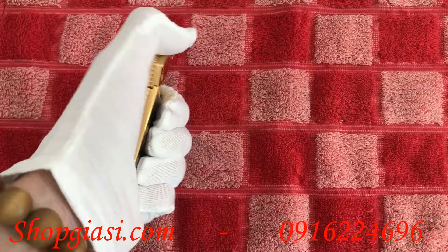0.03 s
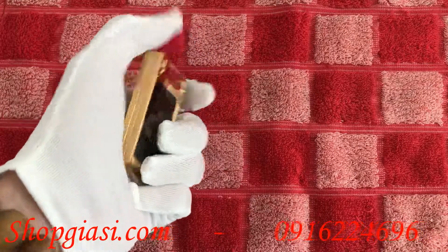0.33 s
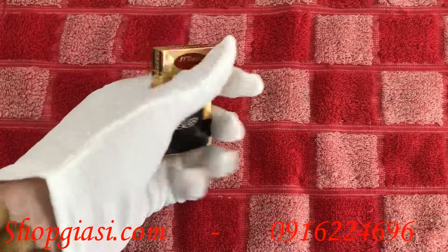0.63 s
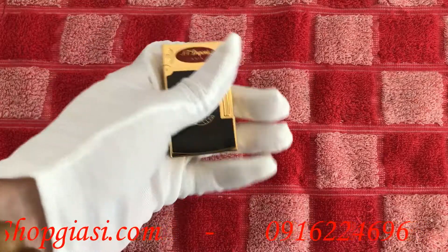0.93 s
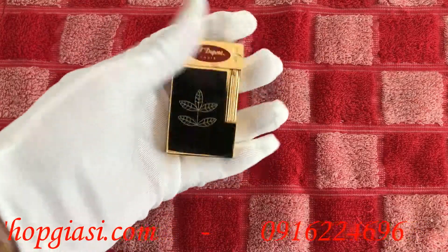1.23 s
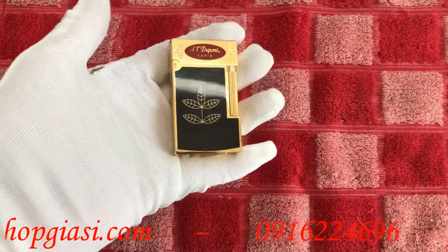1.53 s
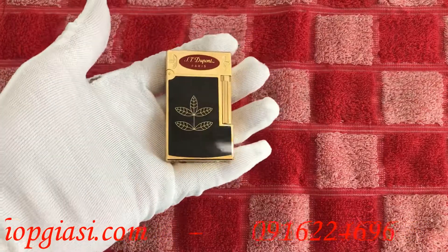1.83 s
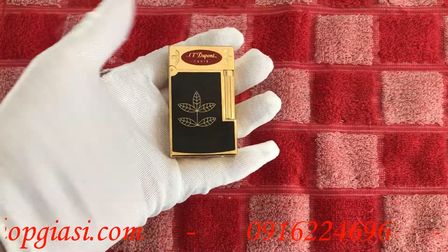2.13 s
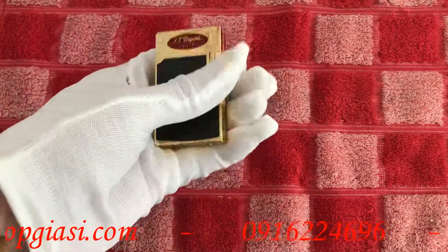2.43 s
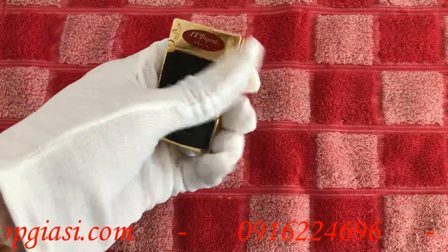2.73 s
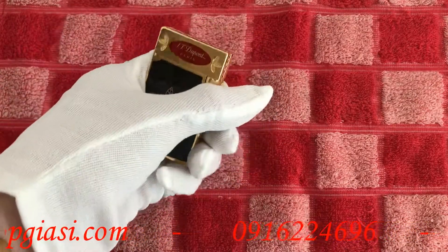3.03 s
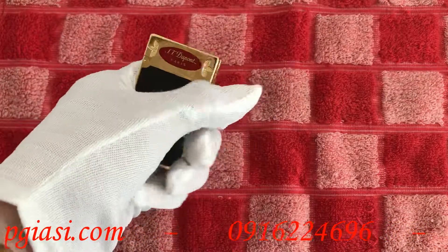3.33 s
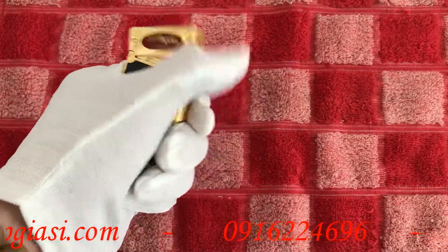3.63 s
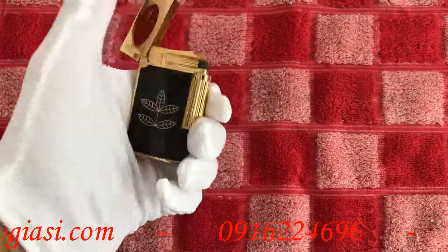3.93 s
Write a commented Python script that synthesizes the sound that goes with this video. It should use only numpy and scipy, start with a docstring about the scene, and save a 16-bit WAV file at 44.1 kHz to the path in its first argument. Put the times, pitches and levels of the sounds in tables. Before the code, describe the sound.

Close up in a small room, a metal lighter clicks sharply shut and, after a pause with soft glove rustles, springs open with a clear ringing ping. Faint motorbike engines and traffic hum outside throughout.

```python
"""A metal lighter is snapped shut, turned in a gloved hand and flicked open again, close by.
Each impact excites the modes of lid and case: shut, they give a short bright clink; open, the free lid
rings like a small bell. Friction of glove and hinge adds soft noise, and a small room reverberates.
Outside, in faint traffic rumble, one motorbike idles and another pulls away, each sounding the
harmonics of its firing rate."""
import sys
import numpy as np
from scipy import signal
from scipy.fft import rfft, irfft
from scipy.io import wavfile

SR = 44100
rng = np.random.default_rng(int(sys.argv[2]) if len(sys.argv) > 2 else 0)


def dump(signal):
    """Clip the signal to [-1, 1] and save it as 16-bit WAV at the path in sys.argv[1]."""
    limited = np.clip(np.atleast_2d(signal).T, -1, 1)
    pcm = np.round(limited * 32767).astype(np.int16)
    wavfile.write(sys.argv[1], SR, pcm)


N = 176400
T = np.arange(N) / SR
FREQS = np.fft.rfftfreq(N, 1 / SR)


def undb(db):
    """Amplitude ratio of a level in decibels."""
    return 10 ** (np.asarray(db) / 20)


def unit(x):
    """Normalisation to rms 1."""
    return x / np.sqrt(np.mean(x ** 2))


def curve(rows, column=1):
    """Linear interpolation of one column over time."""
    rows = np.array(rows)
    return np.interp(T, rows[:, 0], rows[:, column])


def filtered_noise(gain):
    """Spectral shaping of white noise, rms 1."""
    return unit(irfft(rfft(rng.standard_normal(N)) * gain, N))


def noise(spectrum):
    """Coloured noise, falling 12 dB per octave below the first point of its spectrum."""
    hz, db = np.array(spectrum).T
    low_cut = np.minimum(FREQS / hz[0], 1) ** 2
    return filtered_noise(undb(np.interp(np.log(FREQS + 1), np.log(hz), db)) * low_cut)


def band(hz, half_width_hz):
    """Noise through a single resonance."""
    return filtered_noise(1 / (1 + ((FREQS - hz) / half_width_hz) ** 2))


def drift(cutoff_hz):
    """Slow random modulation: low-passed noise."""
    return filtered_noise(np.exp(-(FREQS / cutoff_hz) ** 2))


def fade(start, t60):
    """Exponential decay, 60 dB in t60 seconds."""
    return (T >= start) * np.exp(-np.log(1000) * np.clip((T - start) / t60, 0, 10))


def swell(centre, half_width):
    """Gaussian envelope, 1/e at one half-width from its centre."""
    return np.exp(-np.minimum(((T - centre) / half_width) ** 2, 10 ** 2))


def ring(start, hz, db, t60, attack_s=0.00038):
    """Free vibration of a struck mode: a damped sinusoid."""
    age = np.maximum(T - start, 0)
    return undb(db) * fade(start, t60) * (1 - np.exp(-age / attack_s)) * np.sin(2 * np.pi * hz * age)


def traffic():
    """Amplitude-modulated noise: rumble and tyre wash ebb while narrow bands of hiss swell and fade."""
    # spectra (frequency [Hz], relative density [dB])
    rumble_spectrum = [(20, -35), (35, -24.5), (50, -10.5), (66, -7), (81, 2), (96, -7.5), (116, 2.5),
                       (135, -6.5), (160, -21), (250, -36), (500, -55.5)]
    wash_spectrum = [(120, -7), (200, 0), (268, -4.5), (387, -1.5), (491, -7), (821, -9), (1320, -7.5),
                     (1650, -12.5), (2510, -15), (4950, -25), (6640, -24.5), (10300, -35), (16000, -34)]
    # envelopes (time [s], level [dB])
    rumble_levels = [(0, -33.5), (.6, -48.5), (1, -32), (1.4, -35.5), (2.2, -38), (2.8, -39), (3.6, -36.5),
                     (4, -44)]
    wash_levels = [(0, -44), (.8, -44), (1.2, -47.5), (2, -44.5), (2.6, -48), (3, -54), (3.6, -52),
                   (4, -58)]
    # hiss bands (time [s], half-width [s], frequency [Hz], half-width [Hz], level [dB])
    hisses = [(2.1, 0.37, 6770, 420, -61), (2.505, 0.16, 6800, 610, -57.5), (2.34, .3, 8600, 680, -65),
              (3.487, 0.62, 7000, 400, -66.5), (2.5, 0.77, 1320, 78, -56), (1.9, .6, 2560, 88, -60)]
    rumble = noise(rumble_spectrum) * undb(curve(rumble_levels) + drift(6.9))
    wash = noise(wash_spectrum) * undb(curve(wash_levels) + .5 * drift(15))
    hiss = sum(undb(db) * swell(at, span) * band(hz, width) for at, span, hz, width, db in hisses)
    return rumble + wash + hiss


def whine():
    """A faint, far-off tone under random frequency and amplitude modulation."""
    hz = 1085 * (1 + .005 * drift(23))
    tone = unit(np.sin(2 * np.pi * np.cumsum(hz) / SR))
    return undb(-59 + 2 * drift(12)) * swell(centre=3.32, half_width=.28) * tone


def motorbike(drive, exhaust, booms):
    """Source and filter: the exhaust colours harmonics of the firing rate; each wavers on its way."""
    firing_hz = curve(drive) * (1 + 0.0019 * drift(8.7))
    phase = 2 * np.pi * np.cumsum(firing_hz) / SR
    hz, db = np.array(exhaust).T
    engine = np.zeros(N)
    for k in range(1, 21):
        boom_db = sum(gain * swell(at, span) for at, span, harmonic, gain in booms if harmonic == k)
        level_db = np.interp(k * firing_hz, hz, db) + boom_db + 2.1 * drift(2.7)
        engine += undb(level_db) * np.sin(k * phase + 2 * np.pi * rng.random())
    return unit(engine) * undb(curve(drive, column=2))


def motorbikes():
    """Firing rate sets pitch: nearly steady in the idling engine, rising in the one pulling away."""
    # engine running (time [s], firing rate [Hz], level [dB])
    idle_drive = [(0, 27.7, -32), (.35, 27.8, -31), (.75, 27.7, -32), (1, 27.5, -37), (1.4, 27.3, -42),
                  (1.8, 27.2, -54)]
    pull_drive = [(1.1, 21.19, -56), (1.35, 21.77, -45.5), (1.6, 23.34, -31.5), (1.85, 25.22, -37),
                  (2.1, 26.25, -33), (2.5, 26.8, -31), (2.7, 26.55, -44), (3.3, 26.6, -48), (4, 26.6, -77)]
    # exhaust responses (frequency [Hz], gain [dB])
    idle_exhaust = [(28, -41.5), (56, 6), (83, 3), (111, 2.5), (139, 2.5), (167, -10.5), (195, -8),
                    (250, -31), (310, -16.5), (395, -18.5), (520, -26.5), (800, -34.5)]
    pull_exhaust = [(26, -24), (52, -13.5), (80, -12.5), (105, -11), (130, 6.5), (160, -16.5), (208, -25),
                    (255, -33), (315, -13.5), (350, -29), (395, -23.5), (520, -37), (800, -37)]
    # one harmonic booms for a while (time [s], half-width [s], harmonic number, gain [dB])
    idle_booms = [(0.204, .25, 4, 8), (.85, 0.37, 5, 7)]
    pull_booms = [(2.25, 0.67, 5, 1.6)]
    idling = motorbike(idle_drive, idle_exhaust, idle_booms)
    return idling + motorbike(pull_drive, pull_exhaust, pull_booms)


def room(x, delay_s=.005):
    """Diffuse reverberation: convolution with decaying noise, the treble lasting slightly longer."""
    white = rng.standard_normal(N)
    low = irfft(rfft(white) * np.exp(-(FREQS / 7000) ** 2), N)
    tail = low * fade(delay_s, t60=0.55) + (white - low) * fade(delay_s, t60=0.58)
    return signal.fftconvolve(x, tail / np.sqrt(np.sum(tail ** 2)))[:N]


def handling():
    """Friction noise: the glove slides on the case; the hinge scrapes just before the lid opens."""
    # strokes (time [s], half-width [s], level [dB])
    rubs = [(1.17, .05, -60), (2.545, .022, -58), (2.69, .018, -61), (2.85, .02, -68), (3.17, .025, -69),
            (3.783, .027, -50)]
    scrapes = [(3.756, 0.027, -46), (3.792, .018, -60)]
    # cloth on metal (frequency [Hz], relative density [dB])
    rub_spectrum = [(1500, -11), (4000, -14), (9000, -9), (13000, -6), (15500, -11)]
    glove = noise(rub_spectrum) * sum(undb(db) * swell(at, span) for at, span, db in rubs)
    hinge = band(3260, half_width_hz=260) * sum(undb(db) * swell(at, span) for at, span, db in scrapes)
    return glove + hinge


def lid_cracks():
    """Impact transients: dense, quickly damped modes merge into a burst of noise at each contact."""
    # the lid strikes, then the sprung cam rebounds (time [s], kind, level [dB])
    contacts = [(0.2124, "shut", -12.5), (0.2174, "shut", -20.5), (3.8018, "open", -19.5),
                (3.8027, "open", -20), (3.8103, "open", -23)]
    # contact spectra by kind (frequency [Hz], relative density [dB])
    spectra = {"shut": [(300, -30), (1200, -29), (2100, 3), (2650, -3), (3200, -1), (4500, -6.5),
               (8500, -4.5), (10300, -12.5), (12300, 10.5), (13800, -11), (15400, 2)], "open": [(300, -22),
               (1600, -18.5), (2400, 2.5), (3400, 10), (4500, 4.5), (5100, -6), (6900, -3.5), (8200, -9.5),
               (10300, -20.5), (12400, -11), (13600, -11), (14800, -11), (15500, -8)]}
    return sum(undb(db) * fade(start, t60=0.036) * noise(spectra[kind]) for start, kind, db in contacts)


def lid_bell(hz=3319.5):
    """A lightly damped mode of the lid sings on, faint when shut and full when free."""
    # bell tones (time [s], level [dB], t60 [s])
    tones = [(.2125, -47, .8), (3.8015, -11, .62)]
    return sum(ring(start, hz, db, t60) for start, db, t60 in tones)


def lid_clinks():
    """Modal superposition in the struck lid and case; returns the direct sound and the room's feed."""
    # lid blows (time [s], kind, direct gain [dB], gain into the room [dB])
    blows = [(0.2126, "shut", -17, -6.5), (3.8012, "open", -13, -10.5)]
    # natural frequencies of lid and case [Hz]
    mode_hz = [3314, 3470, 3594, 7106, 7165, 9125, 11490, 11560, 12255, 12565, 12640, 15200]
    # those modes, damped by hinge and glove (open level [dB], open t60 [s], shut level [dB], shut t60 [s])
    modes = [(5.5, 0.038, -11, .1), (-9, .12, -36.5, 0.05364), (-24, .24, -41.5, 0.039),
             (-2, 0.08, -14.5, 0.088), (-30, 0.035, 2.5, 0.037), (-16, 0.036, -17, 0.12),
             (-11.5, 0.038, -4.5, 0.07), (-21, .04, -4, 0.072), (-16, .025, -12.5, .04),
             (-8, 0.046, 0.5, .085), (-25, .06, 1.5, 0.11), (-22, .02, -15, .03)]
    direct, to_room = np.zeros(N), np.zeros(N)
    for start, kind, db, room_db in blows:
        decays = [row[:2] if kind == "open" else row[2:] for row in modes]
        clink = sum(ring(start, hz, db + mode_db, t60) for hz, (mode_db, t60) in zip(mode_hz, decays))
        direct += clink
        to_room += undb(room_db) * clink
    return direct, to_room


def scene():
    """Superposition of the lighter's direct sound, its reverberation and the street."""
    bell, cracks = lid_bell(), lid_cracks()
    clinks, clinks_to_room = lid_clinks()
    to_room = undb(-17) * bell + undb(-8) * cracks + clinks_to_room
    street = motorbikes() + traffic() + whine()
    return (bell + cracks + clinks + room(to_room) + handling() + street)[None]


def record(dry, cutoff_hz=15750):
    """Band limiting: a steep elliptic low-pass removes the highest treble."""
    return signal.sosfilt(signal.ellip(10, .2, 80, cutoff_hz, fs=SR, output="sos"), dry)


dry = scene()
out = record(dry)
dump(out)
```